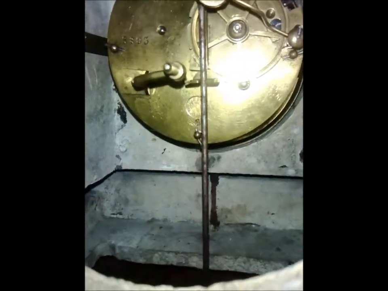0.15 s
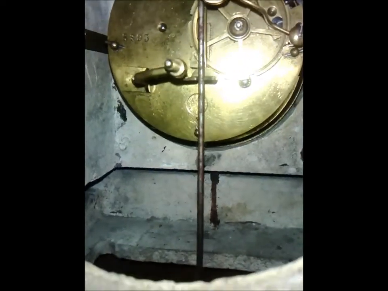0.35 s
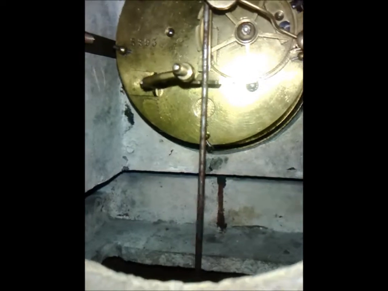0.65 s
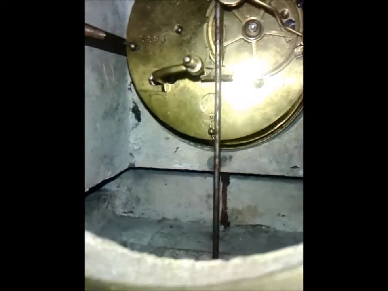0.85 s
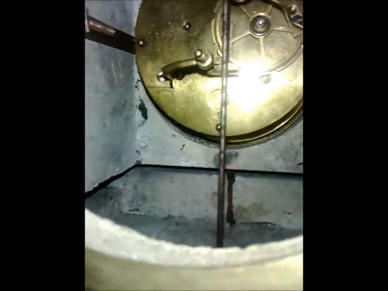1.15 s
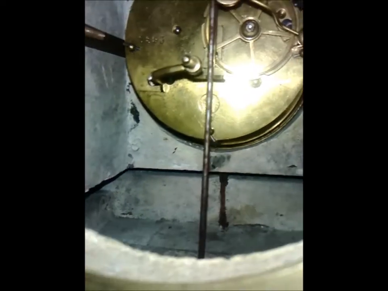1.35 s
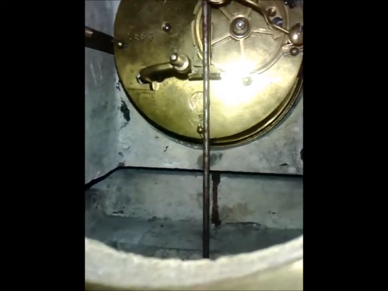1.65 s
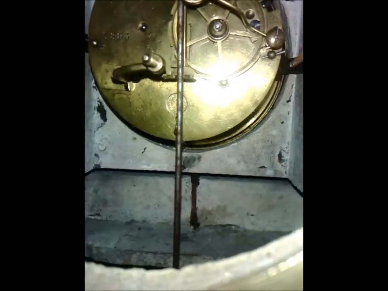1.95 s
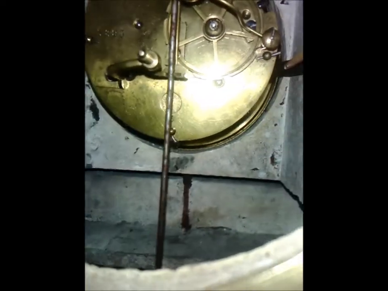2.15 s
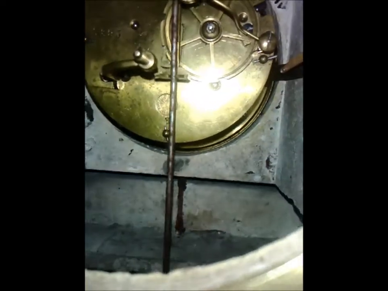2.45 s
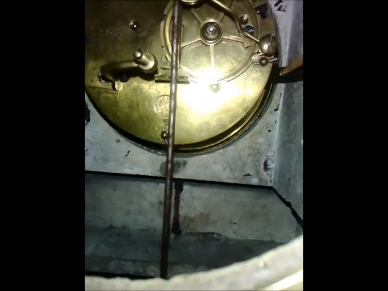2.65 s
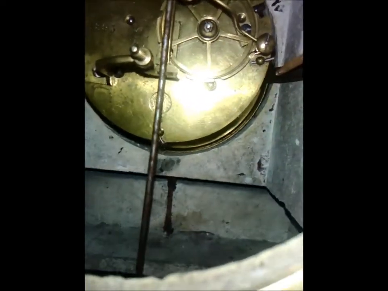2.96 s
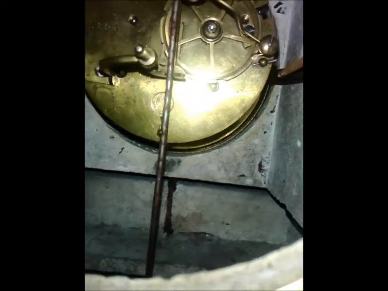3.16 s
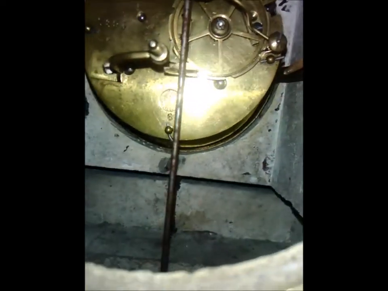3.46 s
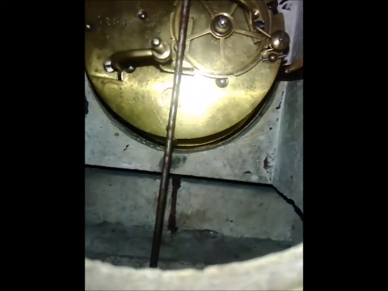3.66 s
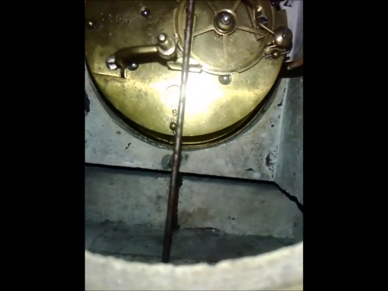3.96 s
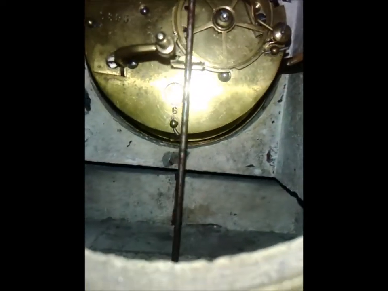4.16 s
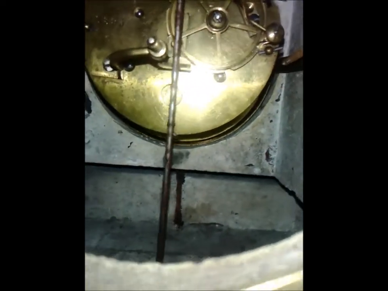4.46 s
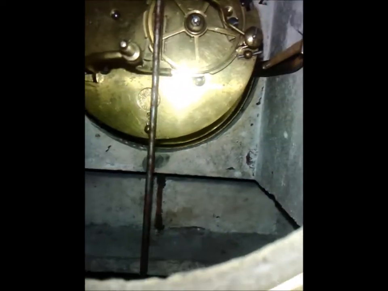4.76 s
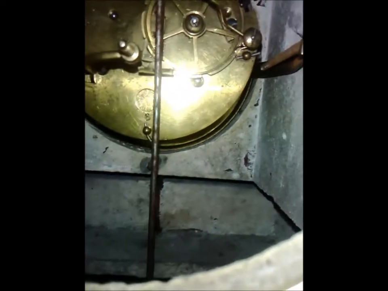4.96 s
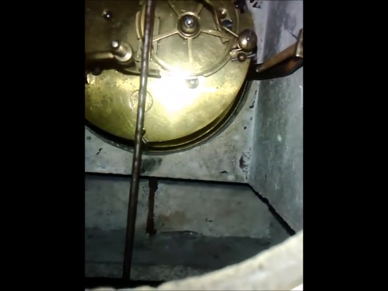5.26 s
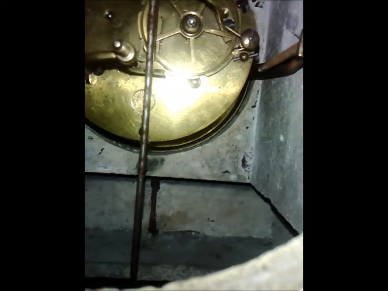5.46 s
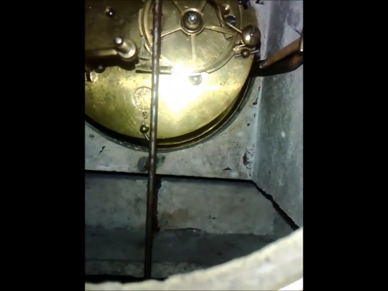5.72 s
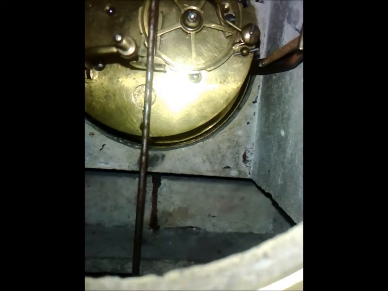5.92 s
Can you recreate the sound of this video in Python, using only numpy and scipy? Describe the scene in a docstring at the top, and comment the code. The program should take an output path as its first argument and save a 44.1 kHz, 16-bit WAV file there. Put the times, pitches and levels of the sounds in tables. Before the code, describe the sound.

Close stereo microphone at an open stone clock case in a quiet room. The escapement clicks in a limping loud-soft pattern, strong ticks leaning right and weaker tocks more even across both sides. Just before three seconds something rubs softly and bumps dully, then only ticking continues, with one tiny metallic touch later. Wide, soft hiss and a barely audible high whine stay beneath.

```python
"""Pendulum movement in a stone case

A brass movement ticks inside its stone case, close to a two-port microphone whose right port faces it.
The escape wheel lands in turn on two pallets: damped plate modes and noise give a bright tick, then a duller tock.
Shaped noise with random slips makes a soft rub; a few low wooden modes make dull knocks.
Under it all lie a quiet room and the microphone's hiss, both filtered noise, with a thin whine of sines.
The recorder widens the lows with a short delay."""
import sys
import numpy as np
from scipy.fft import rfft, irfft, next_fast_len
from scipy.io import wavfile
from scipy.ndimage import uniform_filter1d, map_coordinates

SR = 44100
rng = np.random.default_rng(int(sys.argv[2]) if len(sys.argv) > 2 else 0)


def to_wav(sig):
    """Store sig (one row per channel, or 1-D mono) as 16-bit WAV at the path in sys.argv[1].

    Samples outside -1..1 are clipped; the rate is SR.
    """
    pcm = np.clip(np.atleast_2d(sig), -1, 1) * 32767
    pcm = np.round(pcm).astype(np.int16)
    wavfile.write(sys.argv[1], SR, pcm.T)  # frames by channels


N = 268569


def amp(db):
    """Decibel law: the amplitude gain of a level in dB."""
    return 10 ** (np.asarray(db) / 20)


def unit(x):
    """Normalisation: x scaled to an rms of 1."""
    return x / np.sqrt(np.mean(x ** 2) + 1e-20)


def along(points, hz):
    """Logarithmic frequency scale: (frequency, value) points interpolated at hz."""
    f, v = np.transpose(points)
    return np.interp(np.log(hz + 1), np.log(f + 1), v)


def filtered(x, response):
    """Linear filtering: the spectrum of x times a response of frequency."""
    n = x.shape[-1]
    padded = next_fast_len(n + 8192)
    hz = np.fft.rfftfreq(padded, 1 / SR)
    return irfft(rfft(x, padded) * response(hz), padded)[..., :n]


def add(track, s, sound):
    """Superposition: lays a two-channel sound into the track at a time in s."""
    start = round(s * SR)
    track[:, start:start + sound.shape[1]] += sound


def curve(rows):
    """Piecewise-linear envelope: one value per sample from (time, value) rows."""
    return np.interp(np.arange(N) / SR, *np.transpose(rows))


def wobble(rate):
    """Band-limited fluctuation: a smooth random curve with rate knots a second."""
    knots = rng.standard_normal(int(N * rate / SR) + 4)
    return map_coordinates(knots, [np.arange(N) * rate / SR])


# noise alike in both ports: (frequency [Hz], relative density [dB per Hz])
AIR_SPECTRUM = [(12, -24), (20, -3.5), (145, 1.5), (260, -1.5), (344, -2.5), (618, -6.5), (1110, -8.5),
                (1900, -8), (3400, -4), (5000, -4.5), (6400, -10), (7300, -25), (9500, -12), (11600, -2.5),
                (15200, -8)]
# noise opposite in the ports: (frequency [Hz], relative density [dB per Hz])
HISS_SPECTRUM = [(20, -9), (100, -10), (400, -12.5), (1000, -17.5), (2000, -17), (4900, -8.5), (7800, -11),
                 (11900, -5), (15700, -5.5)]
# thin electronic tones: (frequency [Hz], peak level [dB] while opposite in the ports)
WHINE_TONES = [(12897, -64), (9964, -71)]
# far rumble: (time [s], level [dB])
RUMBLE_LEVEL = [(0, -72.5), (0.22, -72.5), (0.31, -61), (0.42, -76.5), (1.0, -67.5), (1.5, -76),
                (6.09, -77.5)]
RUMBLE_SWING_DB, RUMBLE_RATE = 3, 6  # swells: depth [dB], knots a second
# moments when the treble hiss draws to the centre: (start [s], end [s])
NARROW_SPANS = [(0.145, 0.3), (0.57, 0.65), (2.525, 2.6), (2.96, 3.11), (3.335, 3.44), (3.76, 3.83),
                (4.1, 4.185), (4.54, 4.625), (5.685, 5.855)]
NARROW_HZ, NARROW_EDGE_S = 4600, 0.045  # above this frequency; length of the change
NARROW_DB = -4.5  # level of the centred treble, about which it flickers


def room():
    """Correlation of noise fields: air and rumble are alike in both ports, hiss and whine mostly opposite."""
    t = np.arange(N) / SR

    def spectra(hz):
        return amp([along(AIR_SPECTRUM, hz) - 9, along(HISS_SPECTRUM, hz)]) * (hz < 15550)

    def low_band(hz):
        return hz ** 2 / (50 ** 2 + hz ** 2) / (1 + (hz / 110) ** 4)

    alike, hiss = amp(-53.5) * unit(filtered(rng.standard_normal((2, N)), spectra))
    swells = amp(RUMBLE_SWING_DB * wobble(RUMBLE_RATE))
    rumble = amp(curve(RUMBLE_LEVEL)) * unit(swells * filtered(rng.standard_normal(N), low_band))
    whine = sum(amp(db) * np.sin(2 * np.pi * hz * t) for hz, db in WHINE_TONES)
    opposite = hiss + whine

    gate = sum((t > start) * (t < end) * 1. for start, end in NARROW_SPANS)
    narrow = uniform_filter1d(gate, size=round(NARROW_EDGE_S * SR))
    treble = filtered(opposite, lambda hz: hz > NARROW_HZ) * narrow
    centred = amp(NARROW_DB + 2.8 * wobble(30)) * treble
    return alike + rumble + centred + (opposite - treble) * [[1], [-1]]


# a soft rub: (time [s], low resonance level [dB], high resonances level [dB], hiss level [dB])
RUB_LEVELS = [(2.4, -85, -80, -75), (2.46, -67, -62, -60), (2.54, -63.5, -66, -61.5),
              (2.65, -72, -71.5, -72), (2.69, -70, -66.5, -64), (2.72, -61, -60, -58),
              (2.745, -65, -69, -62), (2.79, -64, -69.5, -66), (2.85, -66, -75, -66), (2.89, -83, -78, -64),
              (2.96, -69.5, -70, -66), (3.06, -67, -76, -64), (3.11, -68, -72, -75), (3.25, -85, -83, -75)]
# per layer, resonances before their response is squared: (frequency [Hz], width [Hz], gain [dB])
RUB_RESONANCES = [
    [(315, 180, -1.5)],
    [(1165, 380, -2.5), (1340, 430, -3.5)],
    [(2460, 10600, -1.5)],
]
SLIPS_PER_S, SLIP_SIZE = 170, 4.3  # mean rate; mean size against the noise bed's rms
RUB_SWING_DB = 2


def rub():
    """Stick-slip friction: uneven small slips on a bed of noise ring hollow resonances, beside a plain hiss."""
    s, *levels = np.transpose(RUB_LEVELS)
    out = np.zeros(N)
    for layer, (db, peaks) in enumerate(zip(levels, RUB_RESONANCES)):
        struck = rng.random(N) < SLIPS_PER_S / SR
        slips = struck * rng.exponential(SLIP_SIZE, N) * rng.choice([-1, 1], N)
        slips = slips * (layer < 2)  # the hiss has no slips

        def hollow(f):
            # neighbouring resonances alternate in sign
            return sum((-1) ** j * amp(gain) * 1j * f * width / (centre ** 2 - f * f + 1j * f * width)
                       for j, (centre, width, gain) in enumerate(peaks))

        sound = unit(filtered(rng.standard_normal(N) + slips, lambda f: hollow(f) ** 2))
        out += amp(curve(list(zip(s, db))) + RUB_SWING_DB * wobble(25.24)) * sound
    t = np.arange(N) / SR
    return out * (t > s[0]) * (t < s[-1])


# modes of the knocked wood: (frequency [Hz], level [dB], t60 [s])
WOOD_MODES = [(151, -8, 0.13), (180, -2.5, 0.058), (240, -3, 0.12), (283, -4, 0.085), (311, -1.5, 0.095)]
# dull knocks: (time [s], level [dB], lift of the two lowest modes [dB])
KNOCK_EVENTS = [(2.717, -41, 1), (2.739, -55, -6), (2.763, -49, 9), (2.812, -51.5, 0)]
KNOCK_RISE_S = 0.0045


def knock():
    """Modal response to a soft impact: only low modes of the wood sound, and their phases waver."""
    out, t = np.zeros((2, N + SR)), np.arange(round(.4 * SR)) / SR
    hz, db, t60 = np.transpose(WOOD_MODES)[:, :, None]
    for s, level_db, low_db in KNOCK_EVENTS:
        drift = np.cumsum(rng.normal(0, 0.029, (len(hz), len(t))), axis=1)
        decay = amp(db + low_db * (hz < 210) - 60 * t / t60)
        ring = (decay * np.sin(2 * np.pi * hz * t + drift)).sum(0)
        add(out, s, amp(level_db) * ring[None] * (1 - np.exp(-t / KNOCK_RISE_S)))
    return out[:, :N]


# light contacts of the crutch on the pendulum rod: (time [s], level [dB])
ROD_CONTACTS = [(2.6931, -50), (4.5974, -38)]
# modes of the touched rod: (frequency [Hz], level [dB])
ROD_MODES = [(2960, 0), (3600, -2), (4400, -3), (5170, -3), (8900, -8), (10800, -5), (11900, -5)]
ROD_T60_S = 0.009


def crutch():
    """Impulse excitation of damped modes: the crutch touches the rod, 5 dB weaker at the left port."""
    out, t = np.zeros((2, N + SR)), np.arange(round(.15 * SR)) / SR
    for s, db in ROD_CONTACTS:
        ring = sum(amp(gain + rng.normal()) * np.sin(2 * np.pi * hz * t) for hz, gain in ROD_MODES)
        decay = amp(db - 60 * t / ROD_T60_S + [[-5], [0]])
        add(out, s, decay * (1 - np.exp(-t / 0.00035)) * ring)
    return out[:, :N]


# dense small modes in the case: (frequency [Hz], relative density [dB per Hz])
CLATTER_SPECTRUM = [(290, -14), (500, -13), (1430, -9), (1890, -5.5), (2350, 4.5), (2640, -2), (6140, 6.5),
                    (7000, -3.5), (10800, 8), (15200, -3.5), (16300, -63)]
# phase by which the left port leads: (frequency [Hz], phase [rad])
LEFT_LEAD = [(2300, -.2), (4400, -1.2), (5600, -3), (10000, -3.3), (11000, -4), (12200, -3.3)]


def clatter(size, left_db, colour):
    """High modal density: many small modes merge into noise, partly coherent between the ports."""
    right, other = rng.standard_normal((2, size))
    turned = filtered(right, lambda hz: np.exp(1j * along(LEFT_LEAD, hz)))
    left = 0.19 * turned + 0.45 * other
    pair = filtered(np.array([left, right]), lambda hz: amp(along(CLATTER_SPECTRUM, hz)))
    return filtered(unit(pair), lambda hz: amp(along(colour, hz))) * amp([[left_db], [0]])


# tick and tock: (time until the tooth rests [s], share of the ring kept [ratio] before the grip's gain,
# time of the bounce [s], strength of the bounce [ratio] before the grip's gain, length of the bounce [s])
TOOTH_CONTACTS = [(0.0068, 0.4, 0.0082, 0.39, 0.0068), (0.0078, 0.45, 0.0068, 0.26, 0.01)]


def contact(t, pallet):
    """Contact damping: the tooth rests, takes away part of the ring, then bounces once."""
    rest_s, kept, bounce_s, strength, length_s = TOOTH_CONTACTS[pallet]
    free = 1 / (1 + (t / rest_s) ** 12)
    bounce = strength / (1 + np.abs((t - bounce_s) / length_s * 2 - 1) ** 6)
    return free, (1 - free) * kept, bounce


# modes of the brass plates: (frequency [Hz])
PLATE_MODES = [768, 1437, 1710, 2120, 2325, 2702, 2830, 3050, 3362, 3700, 3915, 4200, 4465, 5040, 5625,
               5990, 6174, 6513, 7150, 7730, 8400, 8680, 8945, 9130, 9345, 9680, 9996, 10560, 10794, 11008,
               11478, 12195, 13630, 14500]
# strength of each mode in turn: (tick [dB], tick left-right [dB], tock [dB], tock left-right [dB])
PLATE_STRENGTHS = [(-23, -3.5, -20.5, -4), (-28, -8, -13, -7), (-16, -4.5, -16.5, -9), (-21, -9, -19, -9),
                   (-10.5, -5, -4, -9), (-14, -6, -11.5, -21), (-18, -8, -11, 0), (-11.5, -7.5, 0, -16),
                   (-9.5, -13, -10, -14), (-12, -7.5, 1, -22), (-7, -18, -0.5, -17), (-15, -11, -6, -13),
                   (-4.5, -44, -3, -20), (-9.5, -16.5, -11, -9), (-17, -3, -14, 1), (-8.5, -23, -7, -18),
                   (-10.5, -11, -1, -19), (-21, -0.5, -9, -7), (-37, 1, -21, 6), (-19.5, -0.5, -13, -9),
                   (-10.5, -2, -6, -3), (-15, -9, -3, -8), (-13, -16, -17, -17), (-30, -13, -25, -7),
                   (-12.5, -2, -4, -16), (-46, 7, -2, -4), (-32, -11, 0, -12), (-0.5, -20, -1, -17),
                   (0.5, -22, -2, -19), (0, -10, -17, -9), (-10, -11, -21, -11), (-21, -4, -8, -7),
                   (-10, -10, -16, -13), (-27, -4, -18, -7)]
# decay of the modes: (frequency [Hz], t60 at the left port [s], t60 at the right port [s])
PLATE_DAMPING = [(700, 0.12, 0.14), (2000, 0.062, 0.048), (4500, 0.06, 0.042), (6000, 0.045, 0.034),
                 (8400, 0.05, 0.04), (11000, 0.042, 0.034), (15000, 0.015, 0.015)]
# how the resting tooth and its bounce reach the modes: (frequency [Hz], ring kept [dB], bounce [dB])
TOOTH_GRIP = [(770, 0.5, -17), (1490, 4, -11.5), (2400, 3, 1.5), (3970, 1, -1), (5400, 8, -14),
              (10800, 5.5, -8)]


def plates(t, pallet, left_db, colour, touch):
    """Modal superposition: damped sines of the brass plates, with the strengths of the struck pallet."""
    free, held, bounce = touch
    hz = np.array(PLATE_MODES)[:, None]
    level, left = np.transpose(PLATE_STRENGTHS)[2 * pallet:2 * pallet + 2, :, None]
    left_t60, right_t60 = (along(np.array(PLATE_DAMPING)[:, [0, k]], hz) for k in (1, 2))
    kept_gain, bounce_gain = (amp(along(np.array(TOOTH_GRIP)[:, [0, k]], hz)) for k in (1, 2))
    grip = free + held * kept_gain + bounce * bounce_gain

    # each landing varies the modes' levels, pitches and phases a little
    spread = rng.standard_normal((2, len(hz), 2))
    phase = rng.uniform(0, 2 * np.pi, hz.shape)
    wander = np.cumsum(rng.normal(0, 0.076, (len(hz), len(t))), axis=1)  # loose parts roughen every mode
    angle = 2 * np.pi * hz * (1 + .0015 * spread[0, :, 1:]) * t + phase + wander
    strength = grip * amp(level + along(colour, hz) + 0.8 * spread[0, :, :1])
    left_gain = amp(left + left_db + 0.45 * spread[1, :, :1])
    left_wave = left_gain * np.sin(angle + along(LEFT_LEAD, hz) + 0.39 * spread[1, :, 1:])
    left_ring = (strength * amp(-60 * t / left_t60) * left_wave).sum(0)
    right_ring = (strength * amp(-60 * t / right_t60) * np.sin(angle)).sum(0)
    return np.array([left_ring, right_ring])


# wheel tooth lands on a pallet, rows alternating tick and tock: (time [s], level [dB], then against
# that level 0.77 kHz [dB], 1.6 kHz [dB], 2.4 kHz [dB], 5.5 kHz [dB], 8.5 kHz [dB], 10.8 kHz [dB], 13.5 kHz [dB])
LANDINGS = [(0.121, -23, -2, -5, -4.5, -5, -1, -11, 1), (0.5476, -34, -3, -3, -3, -6, 1, -6, 3),
            (0.9119, -26, 1.5, -0.5, -2, 5, 0, -0.5, 4), (1.3327, -33, -2.5, -5, -1.5, -0.5, -18, -0.5, -1),
            (1.7, -25, 0, 2.5, -2, 7, -3, 7, 0), (2.1257, -35, -1, 1, 1, -17, -8, -3, 1),
            (2.4918, -21.5, -2.5, 2, -3.5, 7.5, 4, 1.5, -1), (2.9219, -35.5, -2, 6, 0, -3, -3, 3, 0.1),
            (3.2829, -21, -4, -7, -0.5, 7.5, 2, 1.5, -2), (3.7209, -34, -4, -2, 4, 2.5, -6, 1.5, -3),
            (4.0732, -25.5, -1, -3.5, 5.5, 11, 10.5, 13, -3), (4.5169, -33.5, -1, 1, 2.3, -4, -3, -6, 0.1),
            (4.8647, -22, -2.5, 0, 2, 7.5, 5, 8.5, 0), (5.2968, -33.5, -4, -4, 2.5, -11, -4, -3, 4),
            (5.653, -20.5, -3, -1.5, -0.5, 1.5, 4.5, 5, 2)]
# where a landing's colour is set, none at the fourth: (frequency [Hz])
COLOUR_POINTS = [770, 1600, 2400, 3700, 5500, 8500, 10800, 13500]
# tick and tock pallet, at the usual level: (usual level [dB], lift at the left port [dB],
# answer of the case [dB], clatter [dB])
PALLET_LEVELS = [(-24.5, 3.5, -29.5, -7), (-34, 4.5, -31, -5)]
LEFT_FOLLOWS, CASE_FOLLOWS = -0.75, 0.24  # dB per dB over the usual level: hard landings are more one-sided
LEFT_CLATTER_DB = -8  # the landing's clatter at the left port, before the lift


def escapement():
    """Impact excitation: each landing rings plates and case, and the contact takes a few ms to build."""
    out, t = np.zeros((2, N + SR)), np.arange(round(.15 * SR)) / SR
    # the blow builds more slowly at the left port
    rise = 1 - 1 / (1 + (t / [[.0018], [.0013]]) ** 3)
    for k, (s, db, *band_db) in enumerate(LANDINGS):
        pallet = k % 2
        colour = list(zip(COLOUR_POINTS, np.insert(band_db, obj=3, values=0)))
        usual_db, left_db, case_db, clatter_db = PALLET_LEVELS[pallet]
        left_db = left_db + LEFT_FOLLOWS * (db - usual_db)
        case_db = case_db + CASE_FOLLOWS * (db - usual_db)

        touch = free, held, _ = contact(t, pallet)
        ring = plates(t, pallet, left_db, colour, touch)
        clatter_fade = (free + held) * amp(clatter_db - 60 * t / [[.055], [.04]])
        blow = ring + clatter_fade * clatter(len(t), left_db + LEFT_CLATTER_DB, colour)
        case = amp(case_db - 60 * t / .095) * clatter(len(t), -1.5, [(3000, 0), (6000, -7)])
        add(out, s, rise * (amp(db) * blow + case))
        # the resting line dips by the same step at every landing
        add(out, s, -amp(-55.5) * (1 - np.exp(-t / 0.0022)) * np.exp(-(t[None] / 0.016) ** 2))
    return out[:, :N]


def scene():
    """Linear superposition: room, rub, knocks, crutch and escapement add."""
    return room() + rub() + knock() + crutch() + escapement()


TOP_HZ = 16470  # band limit


def record(dry):
    """Comb filtering: after a small offset, delayed lows are added left and subtracted right; then a band limit."""
    shifted = dry - amp(-75.5)

    def delayed_lows(hz):
        return 0.47 * np.exp(-2j * np.pi * hz * 0.00334) / (1 + (hz / 1900) ** 4)  # 3.34 ms late

    late = filtered(shifted.mean(0), delayed_lows)
    return filtered(shifted + late * [[1], [-1]], lambda hz: hz < TOP_HZ)


dry = scene()
out = record(dry)
to_wav(out)
```